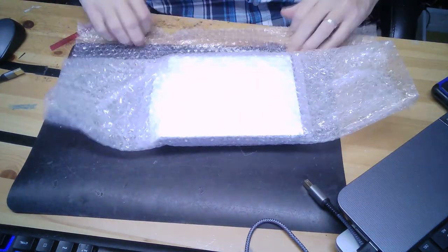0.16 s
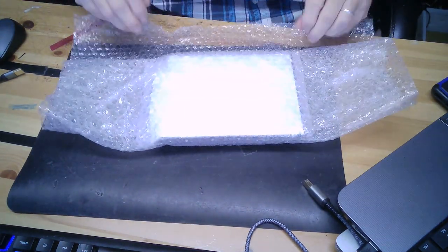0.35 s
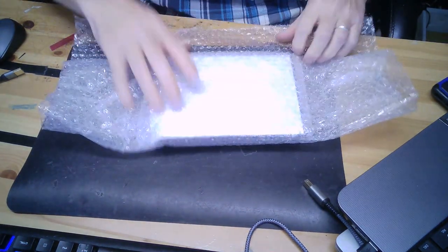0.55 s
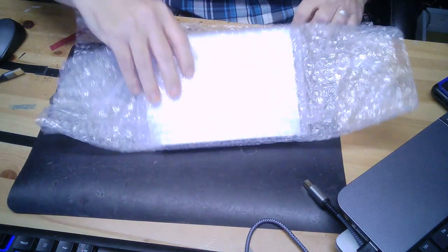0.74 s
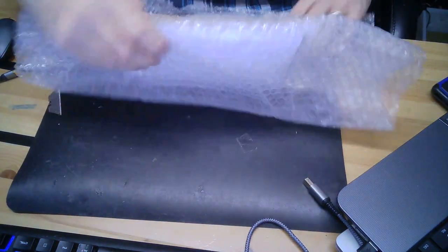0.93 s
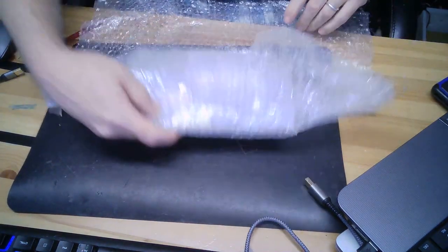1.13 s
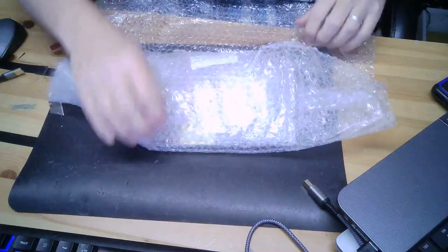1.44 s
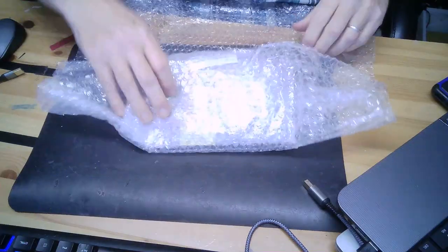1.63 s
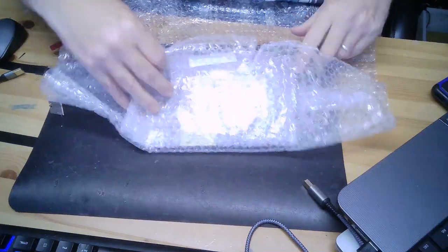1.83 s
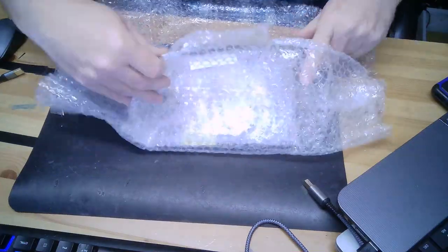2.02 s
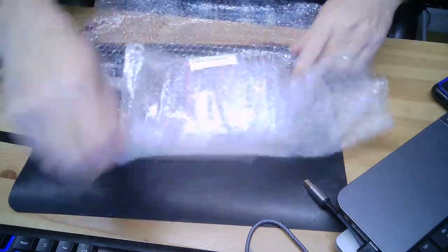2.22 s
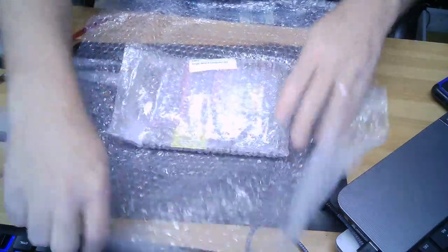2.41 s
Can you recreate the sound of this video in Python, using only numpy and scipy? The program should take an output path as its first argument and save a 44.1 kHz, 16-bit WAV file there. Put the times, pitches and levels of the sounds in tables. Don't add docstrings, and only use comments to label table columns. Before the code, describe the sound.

Hands unwrap a bubble-wrapped parcel, plastic film crackling, folds snapping, the desk thudding softly.

```python
import sys
import numpy as np
from scipy import signal
from scipy.fft import rfft, irfft
from scipy.io import wavfile
from scipy.ndimage import uniform_filter1d

SR = 44100
rng = np.random.default_rng(int(sys.argv[2]) if len(sys.argv) > 2 else 0)


def nominal_scale(level):
    x = np.asarray(level, float) / 20
    return 10 ** x


def to_wav(s):
    ch = np.atleast_2d(s).T
    pcm = np.round(np.clip(ch, -1, 1) * 32767)
    wavfile.write(sys.argv[1], SR, pcm.astype(np.int16))


N = 112454

# f/Hz, level per Hz/dB
ROOM_TONE = [(35, -20), (60, 0), (270, -16), (400, -15.5), (850, -21), (1600, -30), (4000, -36),
             (7800, -38), (9700, -60)]
# f/Hz, level per Hz/dB
AIR_TONE = [(4, -3), (14, 3), (30, 0), (60, -12), (120, -34.5)]
# f/Hz, level/dB
WHINE_TONES = [(1075.5, -59.5), (2150, -75)]
# f/Hz, level/dB, time to fall 60 dB t60/s
DESK_MODES = [(33, 1, .14), (56, -3, .13), (80.5, -1, .33), (102, -7, .12), (136, 0, .17), (165, -8, .1),
              (200, -6, .11), (250, -3, .11), (355, -3, .13), (458, -10, .08), (550, -9, .08)]
# t/s, strength/dB, favoured f/Hz, reach/octaves
DESK_KNOCKS = [(.2368, -15.5, 260, 0.78), (.2421, -16, 107, 1.35), (.325, -29.5, 35, 5),
               (.366, -41, 110, 0.48), (.458, -30, 33, 0.56), (.555, -53, 250, 0.53),
               (.643, -31, 112, 0.92), (.663, -26, 55.4, 4.9), (.70, -31.5, 150, 0.34), (.726, -36, 80, 0),
               (1.05, -41.5, 201, -0.51), (1.064, -36, 390, 1.5), (1.115, -32.5, 135, 0.27),
               (1.186, -26.5, 40, 1.05), (1.2, -38.5, 150, 0.72), (1.235, -27.5, 107, 0.3),
               (1.268, -25, 179, 0.48), (1.282, -20, 135, 0.067), (1.29, -19, 38, 0.36),
               (1.302, -27, 85, 0.7), (1.345, -33, 135, 1.6), (1.43, -39, 85, -2.1), (1.57, -42, 200, 1.4),
               (1.67, -38, 101, 0.3), (1.70, -35.5, 171, 0.35), (1.74, -35.5, 140, 0.11),
               (1.993, -38, 202, 0.74), (2.162, -37.5, 235, 0.9), (2.266, -42, 80, 0.9),
               (2.29, -39, 200, 1.74), (2.349, -29, 45, 0.29), (2.536, -36.5, 150, 0.86)]
# t/s, peak level/dB, centre f/Hz, length/s
FOLD_SNAPS = [(.1067, -29, 6280, .002), (.2159, -24, 5230, .004), (.2368, -22.5, 2090, 0.0029),
              (.2398, -16.5, 1940, 0.0031), (.4224, -36.5, 5700, 0.0027), (.4402, -39, 5500, .003),
              (.4755, -41, 5800, .002), (.4943, -37, 2120, .0015), (.4945, -41, 7000, .001),
              (.5125, -32, 6230, .002), (.522, -42, 5800, 0.0046), (.531, -39.5, 2300, 0.0016),
              (.5591, -41.5, 6450, .002), (.6474, -23.5, 2600, .003), (.684, -22.5, 1690, 0.0032),
              (.713, -26, 6200, 0.0044), (.7597, -39, 2180, 0.0022), (.790, -25, 3020, 0.005),
              (.7905, -26, 6500, 0.0029), (.8245, -24.5, 6600, 0.00096), (.8285, -17.5, 6190, 0.0013),
              (.8318, -26, 6600, .0015), (.9926, -28, 6830, .002), (1.1124, -31, 5000, 0.0041),
              (1.1847, -26.5, 2260, 0.0037), (1.1942, -29.5, 4500, 0.0027), (1.2785, -26, 7000, 0.0035),
              (1.286, -24.5, 2450, 0.0085), (1.3113, -17, 7000, 0.0023), (1.315, -20, 6650, 0.0038),
              (1.3133, -21.5, 3600, .007), (1.3332, -13, 2720, 0.00028), (1.3347, -15.5, 1830, 0.0035),
              (1.3815, -26, 1710, 0.0027), (1.4257, -28, 2390, 0.0068), (1.6177, -39, 5000, .002),
              (1.6477, -35.5, 5500, .003), (1.6866, -33, 2600, .003), (1.7799, -34, 7190, .002),
              (1.8003, -27, 5430, 0.0031), (1.888, -25, 6800, 0.0018), (1.9929, -28.5, 2020, 0.0033),
              (2.0782, -31, 7090, 0.0023), (2.2573, -27, 6900, 0.0028), (2.2902, -30, 5660, 0.0044),
              (2.4886, -20.5, 4900, 0.0045), (2.4912, -21.5, 2650, 0.00064), (2.492, -22.5, 6600, 0.0044),
              (2.5025, -29, 6000, 0.0045), (2.515, -28, 3600, .003)]
# t/s, peak level/dB, centre f/Hz, length/s
CELL_TAPS = [(0.167, -32.5, 1860, 0.0034), (0.2415, -16, 1115, 0.0068), (0.25, -27, 1950, .003),
             (0.266, -31, 1600, .004), (0.566, -32.5, 536, 0.0045), (.633, -38, 900, 0.0036),
             (0.661, -21.5, 1130, 0.0021), (0.669, -26, 900, 0.0031), (0.734, -27.5, 680, 0.0072),
             (1.040, -30, 1510, 0.0046), (1.0668, -22.5, 610, .0015), (1.0683, -29.5, 1200, 0.0044),
             (1.2649, -15, 990, 0.0022), (1.268, -23, 1520, 0.0031), (1.2752, -18, 900, 0.0035),
             (1.279, -21, 1130, 0.0034), (1.301, -24, 1000, 0.0065), (1.31, -20.5, 1150, 0.0043),
             (1.3174, -30, 910, .004), (1.34, -29, 1900, 0.01), (1.503, -37, 560, 0.009),
             (1.739, -36, 564, .006), (1.9924, -30, 560, 0.01), (2.004, -30, 480, 0.023),
             (2.171, -31, 398, .016), (2.545, -32, 500, 0.0033)]
# f/Hz, level per Hz/dB
SCUFF_TONE = [(60, -40), (120, -19), (260, -14), (370, -6), (550, -3), (900, -5), (1800, -10), (3500, -35)]
# f/Hz, level per Hz/dB
FILM_TONE = [(400, -4), (800, -14), (2100, -4), (3000, -6), (4200, -6.5), (5300, -2.5), (7700, 1.5),
             (9800, -12)]
# t/s, crinkle level/dB, pressure on the desk/dB
PULL_MOVES = [
    (0, -38.5, -0.5),
    (0.06, -47.5, -5),
    (.16, -43, -13),
    (0.22, -38.5, -14),
    (0.244, -36.5, 0.5),
    (0.281, -46, 1.5),
    (0.354, -45, -4),
    (.385, -58.5, -20),
    (0.448, -88.5, -7),
]
REACH_MOVES = [
    (0.497, -82, 0),
    (0.509, -51, -5),
    (0.583, -41, -8.5),
    (0.62, -54, -4.5),
]
LIFT_MOVES = [
    (0.637, -38, -1),
    (0.678, -38, -1),
    (0.791, -41, -1.5),
    (0.878, -39.5, -5.5),
    (.96, -37.5, -4),
    (1.041, -42.5, -6.5),
    (1.09, -43, -0.5),
    (1.151, -38.5, -7),
]
FLIP_MOVES = [
    (1.185, -37.5, -6.5),
    (1.25, -36.5, 0),
    (1.3, -39.5, 5.5),
    (1.335, -39.5, 0.5),
    (1.357, -47, 5.5),
    (1.449, -43, -2.5),
    (1.55, -43, -4.5),
    (1.596, -50, -3.5),
    (1.64, -66, 10),
]
GRASP_MOVES = [
    (1.652, -44, -4),
    (1.689, -40, -4),
    (1.80, -43.5, -4.5),
    (1.883, -43.5, -2.5),
    (1.909, -48, -4),
    (1.98, -45.5, 0),
    (1.997, -37.5, -8),
    (2.048, -43, -5.5),
    (2.119, -48, -13),
]
UNFOLD_MOVES = [
    (2.169, -44.5, -1),
    (2.221, -43, -2),
    (2.261, -40.5, -2),
    (2.298, -38.5, -8.5),
    (2.321, -44, -6),
    (2.432, -45, -9),
    (2.48, -47, 0.5),
    (2.5, -41, -19),
    (2.55, -43.5, 3),
]

ROOM_DB, AIR_DB, AIR_GUST_DB = -54, -42, -0.5
AIR_FOLLOWS = .2
CONTACT_CYCLES, DRAG_DB = 0.39, -44
SNAP_WIDTH, SNAP_CLICK, SNAP_EDGE_DB = 1.2, 0.5, -8
SCUFFS_PER_S, SCUFF_SPREAD_DB, SCUFF_FLICKER_DB = 770, 2.5, 1.5
CREASES_PER_S, CREASE_SPREAD_DB, CREASE_TAIL_S, FILM_FLICKER_DB = 2200, 3.4, .0009, 1.5
LARGEST_TICK = 2.6
ECHO_DB, ECHO_T60_S = -11, .15
TOP_HZ, OFFSET = 7800, -.0058


def colour(x, points):
    hz, db = np.array(points, float).T
    size = 2 ** 14
    log_hz = np.log(np.fft.rfftfreq(size, 1 / SR) + 1)
    log_gain = np.interp(log_hz, np.log(hz), db) * np.log(10) / 20
    cepstrum = irfft(log_gain)
    cepstrum[1:size // 2] *= 2
    cepstrum[size // 2 + 1:] = 0
    response = irfft(np.exp(rfft(cepstrum)))[:size // 2]
    y = signal.fftconvolve(x, response)[:N]
    return y / np.std(y)


def ring(x, hz, t60):
    decay = np.log(1000) / (max(t60, 1e-4) * SR)
    pole = np.exp(2j * np.pi * hz / SR - decay)
    return signal.lfilter([1], [1, -pole], x).imag


def walk(rate):
    hold = int(SR / rate)
    steps = np.repeat(rng.standard_normal(N // hold + 1), hold)
    smooth = uniform_filter1d(uniform_filter1d(steps, hold), hold)[:N]
    return smooth / np.std(smooth)


def room_hush():
    return nominal_scale(ROOM_DB) * colour(rng.standard_normal(N), ROOM_TONE)


def electronic_whine():
    t = np.arange(N) / SR
    out = 0
    for hz, db in WHINE_TONES:
        level = nominal_scale(db + 3 + 1.2 * walk(40))
        out = out + level * np.sin(2 * np.pi * hz * t + .4 * walk(8))
    return out


def stirred_air(level_db):
    gusts_db = AIR_GUST_DB * walk(3.2)
    follow_db = AIR_FOLLOWS * (level_db - level_db.mean())
    return colour(rng.standard_normal(N), AIR_TONE) * nominal_scale(AIR_DB + gusts_db + follow_db)


def desk_boom(scuff):
    out = 0
    for hz, mode_db, t60 in DESK_MODES:
        force = np.append(nominal_scale(DRAG_DB) * scuff, np.zeros(SR))
        for j, (at, db, spot_hz, reach) in enumerate(DESK_KNOCKS):
            push = np.hanning(int(CONTACT_CYCLES * SR / spot_hz) + 3)
            octaves = np.log2(hz / spot_hz)
            strength = nominal_scale(db - 4 * (octaves / reach) ** 2)
            i = int(at * SR)
            force[i:i + len(push)] += (-1) ** j * strength * push / push.sum()
        out = out + nominal_scale(mode_db) * ring(force[:N], hz, t60)
    return out


def swarm(per_s, spread_db, tail_s, lo_hz, hi_hz, count=24):
    draw = rng.random((3, N))
    happens = draw[0] < per_s / SR
    size = np.minimum(-np.log(draw[1] + 1e-9), LARGEST_TICK)
    ticks = happens * nominal_scale(spread_db * size) * np.sign(draw[2] - .5)
    t = np.arange(768) / SR
    lengths = max(tail_s, 1e-4) * 2 ** rng.uniform(-0.31, 1, (count, 1))
    tails = rng.standard_normal((count, 768)) * np.exp(-t / lengths)
    kind = rng.integers(0, count, N)
    out = 0
    for k, (tail, hz) in enumerate(zip(tails, np.geomspace(lo_hz, hi_hz, count))):
        pitched = ring(tail, hz, 2.17 / hz)
        rattle = .5 * tail / np.linalg.norm(tail)
        rattle = rattle + np.sqrt(hz / hi_hz) * 0.37 * pitched / np.linalg.norm(pitched)
        out = out + signal.oaconvolve(ticks * (kind == k), rattle)[:N]
    return out


def sheet_scuff(press_db):
    rubs = swarm(SCUFFS_PER_S, SCUFF_SPREAD_DB, 0.00551, 147, 2270)
    return colour(rubs, SCUFF_TONE) * nominal_scale(SCUFF_FLICKER_DB * walk(24.93) + press_db)


def snaps_and_taps():
    events = FOLD_SNAPS + CELL_TAPS
    out = np.zeros(N + 2048)
    t = np.arange(2048) / SR
    for (at, db, hz, length), hiss in zip(events, rng.standard_normal((len(events), 2048))):
        push = hiss * (t < 2 * length) * np.exp(-2 * t / length) * 0.35
        push[0] += SNAP_CLICK * 3
        burst = ring(push, hz, 8.3 / (SNAP_WIDTH * hz))
        burst = ring(burst, hz, 0.58 / (SNAP_WIDTH * hz))
        edge = ring(push, hz, 0.67 / hz)
        shape = burst / np.abs(burst).max() + nominal_scale(SNAP_EDGE_DB) * edge / np.abs(edge).max()
        i = int(at * SR)
        out[i:i + 2048] += nominal_scale(db) * shape
    return out[:N]


def film_crinkle():
    creases = swarm(CREASES_PER_S, CREASE_SPREAD_DB, CREASE_TAIL_S, 1400, 7800)
    return colour(creases, FILM_TONE) * nominal_scale(FILM_FLICKER_DB * walk(39.99))


def room_echo(near):
    t = np.arange(SR // 4) / SR
    echo = rng.standard_normal(len(t)) * nominal_scale(-60 * t / ECHO_T60_S) * (t > .002)
    echo = echo / np.sqrt(np.sum(echo ** 2))
    return nominal_scale(ECHO_DB) * signal.fftconvolve(near, echo)[:N]


def scene():
    moves = PULL_MOVES + REACH_MOVES + LIFT_MOVES + FLIP_MOVES + GRASP_MOVES + UNFOLD_MOVES
    at, level, press = np.array(moves, float).T
    t = np.arange(N) / SR
    level_db = np.interp(t, at, level)
    press_db = np.interp(t, at, press)
    background = room_hush() + stirred_air(level_db) + electronic_whine()
    scuff = nominal_scale(level_db) * sheet_scuff(press_db)
    film = nominal_scale(level_db) * film_crinkle()
    near = film + scuff + snaps_and_taps()
    return (near + room_echo(near) + desk_boom(scuff) + background)[None]


def top_cut(x):
    return signal.sosfilt(signal.butter(12, 8650, fs=SR, output="sos"), x)


def record(dry):
    low_pass = signal.cheby2(14, 62, TOP_HZ * 1.1, fs=SR, output="sos")
    mix = signal.sosfilt(low_pass, dry) + OFFSET
    return top_cut(mix)


dry = scene()
out = record(dry)
to_wav(out)
```